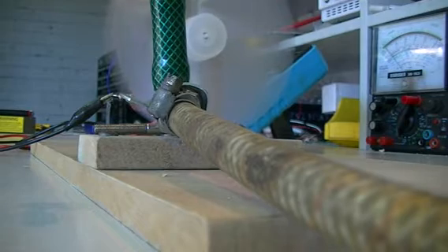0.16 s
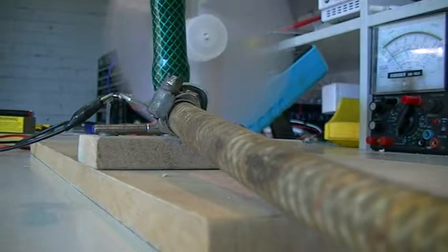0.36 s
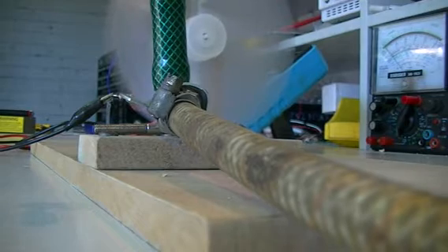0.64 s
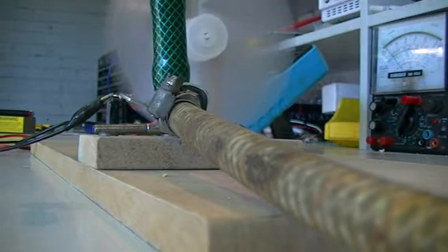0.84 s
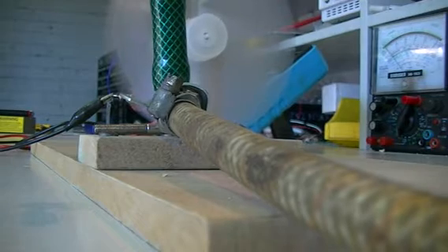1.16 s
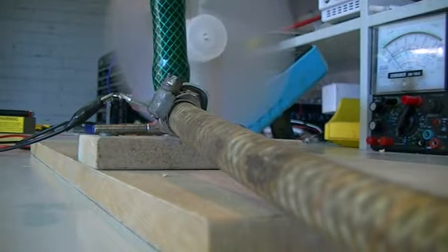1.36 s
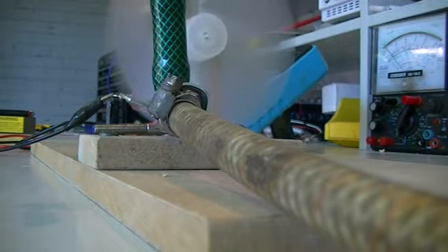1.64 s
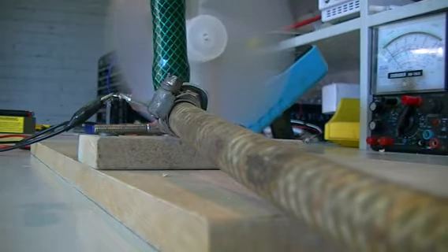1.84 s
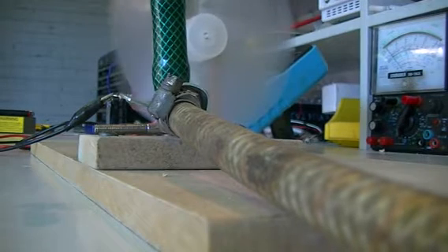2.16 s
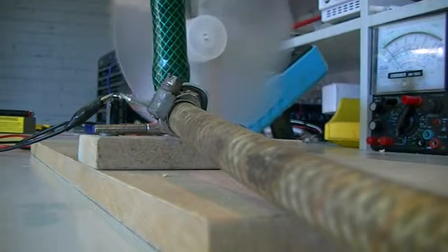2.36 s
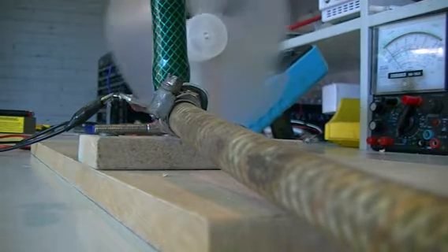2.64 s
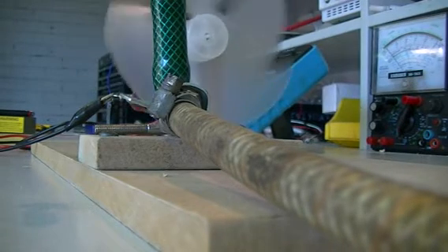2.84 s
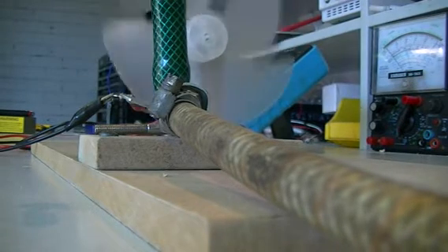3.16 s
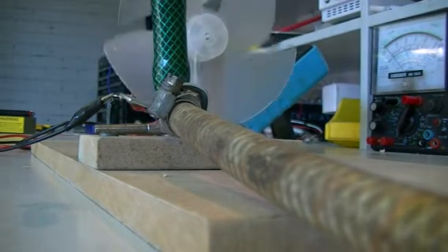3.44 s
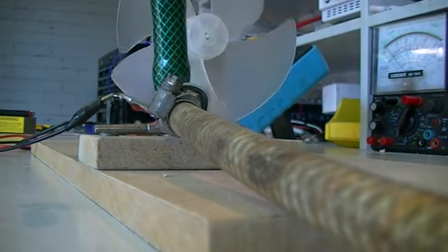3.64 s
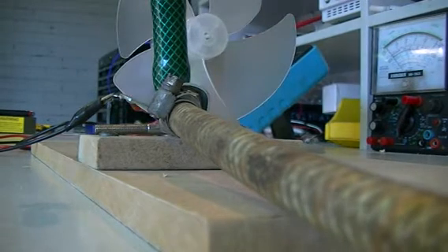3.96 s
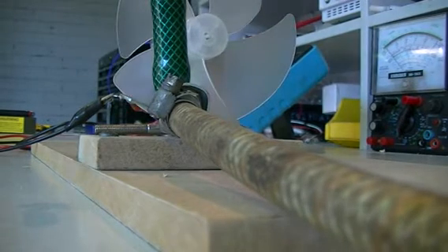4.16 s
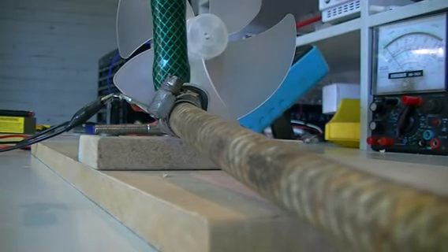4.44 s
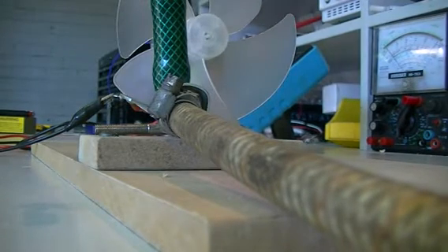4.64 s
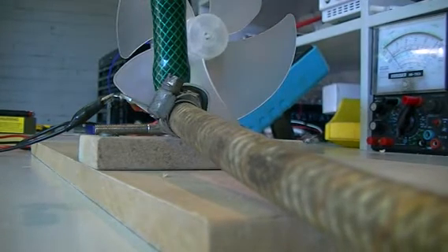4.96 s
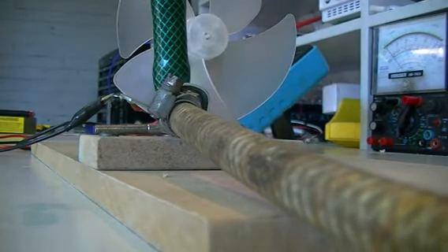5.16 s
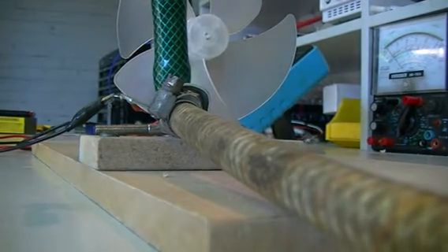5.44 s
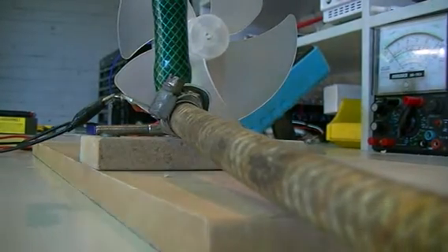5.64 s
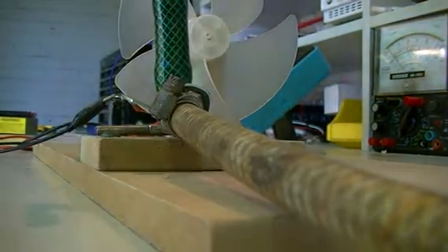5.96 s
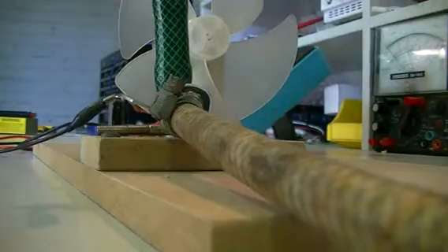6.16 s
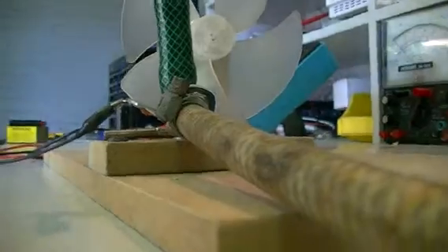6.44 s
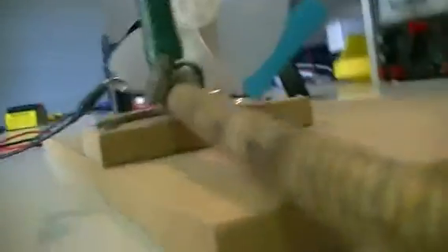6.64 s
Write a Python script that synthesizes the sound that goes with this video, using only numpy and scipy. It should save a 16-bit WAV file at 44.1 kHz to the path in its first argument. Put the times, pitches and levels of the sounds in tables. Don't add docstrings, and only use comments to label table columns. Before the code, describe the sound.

Loud steady air hiss with ringing whistle on a small fan, cut off, then a clattering compressor drone swells up, ending with a click.

```python
import sys
import numpy as np
from scipy import signal
from scipy.fft import rfft, irfft, next_fast_len
from scipy.io import wavfile
from scipy.ndimage import uniform_filter1d

SR = 44100
rng = np.random.default_rng(int(sys.argv[2]) if len(sys.argv) > 2 else 0)


def field_ratio(decibels):
    return 10 ** (np.asarray(decibels, dtype=float) / 20)


def materialize(psi):
    bounded = np.clip(np.atleast_2d(psi).T, -1, 1)
    quanta = np.round(bounded * 32767).astype(np.int16)
    wavfile.write(sys.argv[1], SR, quanta)


N = 299439
SIZE = next_fast_len(N)
HZ = np.maximum(np.fft.rfftfreq(SIZE, 1 / SR), 1)
T = np.arange(N) / SR
HELD_DB = -46.5


def since(s):
    return np.maximum(T - s, 0)


def unit(x):
    return x / np.sqrt(np.mean(x ** 2))


def noise(gain):
    spectrum = rng.standard_normal((len(HZ), 2)).view(complex)[:, 0]
    return irfft(gain * spectrum, SIZE)[:N]


def walk(rate):
    hold = int(SR / rate)
    levels = np.repeat(rng.standard_normal(N // hold + 1), hold)
    return 1.22 * uniform_filter1d(uniform_filter1d(levels, hold), hold)[:N]


def below(hz):
    return 1 / (1 + (HZ / hz) ** 4)


def resonance(hz, width):
    return 1 / (1 + (2 * (HZ - hz) / width) ** 4)


def burst(s, length):
    return np.exp(-((T - s) / length) ** 2)


def colour(points, modes, bed_db):
    hz, db = np.transpose(points)
    power = field_ratio(np.interp(np.log(HZ), np.log(hz), db) + bed_db) ** 2
    for centre, width, peak_db in modes:
        power = power + field_ratio(peak_db) ** 2 * resonance(centre, width)
    return np.sqrt(power)


def ripple(bumps):
    return field_ratio(sum(db * np.exp(-(2 * (HZ - hz) / width) ** 2) for hz, width, db in bumps))


def echoes(wet_db, t60):
    tail = rng.standard_normal(SIZE) * np.exp(-np.log(1000) * np.arange(SIZE) / SR / t60)
    return 1 + field_ratio(wet_db) * rfft(tail) / np.sqrt(np.sum(tail ** 2))


def patchy(gain, octaves, patchy_db, rate):
    place = np.clip(np.log2(HZ), octaves[0], octaves[-1])
    total = 0
    for octave in octaves:
        band = np.cos(np.pi * np.clip(place - octave, -.5, .5))
        total = total + noise(gain * band) * field_ratio(patchy_db * walk(rate))
    return total


# [t/s, level/dB, length/s]
JOLTS = [
    (0.004, -64, .005),
    (1.662, -62, .005),
    (1.84, -72, .005),
    (1.89, -68, .006),
    (6.41, -66, .008),
    (6.78, -54, .005),
]


def jolts():
    total = unit(noise(below(70))) * field_ratio(-106 + 3 * walk(5))
    for s, db, length in JOLTS:
        total += field_ratio(db) * (T - s) / length * burst(s, length) * 2.3
    return total


def panel():
    start, stop, hz, db = 4.17, 5.56, 776.5, -35
    fade = np.clip(np.minimum(T - start, stop - T) / 0.071, 0, 1)
    return field_ratio(db) * np.sin(2 * np.pi * hz * T) * fade


# [t/s, level/dB, f/Hz, width/Hz, length/s]
KNOCKS = [
    (3.151, -23, 680, 250, 0.022),
    (3.77, -26, 750, 300, 0.0068),
    (4.352, -32, 390, 100, 0.026),
    (4.396, -29, 810, 500, .006),
    (6.12, -34, 728, 16, 0.25),
    (2.3, -33, 645, 50, .25),
    (5.5, -31, 2920, 700, 0.023),
    (2.1, -33, 2880, 200, .2),
    (2.76, -34, 2900, 400, .06),
]


def bench():
    return sum(unit(noise(resonance(hz, width))) * field_ratio(db) * burst(s, length)
               for s, db, hz, width, length in KNOCKS)


# [f/Hz, level/dB per Hz]
MACHINE_COLOUR = [(24, -58), (40, -58), (193, -14), (280, -17.5), (408, -7), (485, -10.5), (623, -3.5),
                  (841, -8.5), (1190, -9.5), (1280, -6), (2170, -13.5), (3760, -14.5), (4480, -11),
                  (9700, -25.5), (15600, -49.5)]
# [f/Hz, width/Hz, level/dB]
CASING = [(135, 10, -24.5), (238, 14, -18), (328.2, 8.5, -10.5), (397, 14, -13), (421.2, 7.8, -5.5),
          (514.6, 11, -7.5), (607, 11, -5.5), (638, 21, -2.5), (691, 18, -3.5), (724, 24, -4.5),
          (776, 9, -6), (836, 17, -2.5), (864, 23, -.5), (948, 30, -7.5), (1091, 48, -10), (1307, 17, -7.5),
          (1426, 16, -7), (1630, 12, -7.5), (1944, 95, -13), (2407, 67, -9.5), (2646, 28, -9.5),
          (2820, 124, -14), (3030, 113, -11), (1760, 11, -9), (3460, 260, -13), (4370, 530, -16),
          (5570, 260, -19.5), (13200, 2800, -43.5)]
# [f/Hz, width/Hz, level/dB]
MACHINE_RIPPLE = [(2250, 110, -2), (3760, 120, -1), (3200, 80, 2), (3490, 110, -2.5), (4000, 120, 2.5),
                  (4900, 250, -2), (6100, 290, -1.5), (6460, 120, 2), (6880, 100, 4), (7280, 160, -3.5),
                  (7600, 90, 3.5), (9930, 170, -4), (10680, 100, -2), (10880, 120, 3), (11240, 200, -2.5),
                  (11550, 160, 2.5), (12720, 140, -3), (13180, 400, 3), (13680, 150, -5), (13970, 100, 3),
                  (14280, 300, -3.5), (14750, 220, -5), (15400, 400, -2.5)]
# [t/s, level/dB]
AIR_DRIFT = [(1.9, 1.5), (2.4, 0), (2.65, -1), (2.9, 1), (3.2, -1.2), (3.7, -.5), (4.05, -1.4), (4.35, 0.1),
             (4.7, -0.2), (5.1, 0.5), (5.5, 0), (5.7, 0.2), (6.1, .3), (6.4, -1), (6.79, 0)]


def compressor():
    crank_hz = 14.13
    lift_s, lift_treble_db = 6.42, -2
    gain = colour(MACHINE_COLOUR, CASING, bed_db=-4) * ripple(MACHINE_RIPPLE)
    phase = 2 * np.pi * crank_hz * T
    repeat = 1 / (1 - 0.78 * np.exp(-2j * np.pi * HZ / crank_hz))
    low = gain * np.sqrt(below(1690))
    body = patchy(low, np.arange(8, 11.1, .5), patchy_db=0.9, rate=3.48)
    body = body + field_ratio(-6.5) * noise(low * repeat)
    clatter_db = 0.2 * np.cos(3 * phase - 5.6) + .5 * np.cos(phase - 3.8) - 1.23

    stroke_db = 0.96 * np.cos(phase - 3.7) + 0.13 * np.cos(3 * phase - 5.2) + .5 * walk(24.98)
    middle = gain * np.sqrt((1 - below(1600)) * below(3430))
    air = patchy(middle, np.arange(10.5, 12.1, .5), patchy_db=1.3, rate=4.53)
    turned_away = np.clip(since(lift_s) / .05, 0, 1)
    valves = noise(gain * np.sqrt(1 - below(4560))) * field_ratio(lift_treble_db * turned_away)
    drift_db = np.interp(T, *np.transpose(AIR_DRIFT))
    return unit(body * field_ratio(clatter_db) + (air + valves) * field_ratio(stroke_db) * field_ratio(drift_db))


# [t/s, level/dB, f/Hz, t60/s]
TAPS = [
    (6.3978, -15, 1900, .004),
    (6.3978, -20, 7200, .003),
    (6.4012, -17.5, 6600, .008),
    (6.4055, -21, 7800, .004),
    (6.4012, -27, 9800, .003),
    (6.4058, -28, 10500, .003),
    (6.4097, -11, 1500, .003),
    (6.4118, -10, 1150, .004),
    (6.5526, -23, 1100, .006),
]


def finger():
    rub_s, rub_half_s, rub_db = 6.404, .0065, -22
    snap_s, snap_half_s, snap_db, snap_hz = 6.409, .00033, .8, 1600
    rub = unit(noise((1 - below(1100)) * below(7000) * np.sqrt(below(13000))))
    out = rub * field_ratio(rub_db) * np.exp(-((T - rub_s) / rub_half_s) ** 4)
    out -= field_ratio(snap_db) * np.cos(2 * np.pi * snap_hz * (T - snap_s)) * burst(snap_s, snap_half_s)
    age = np.arange(1024) / SR
    for s, peak_db, hz, t60 in TAPS:
        ring = np.sin(2 * np.pi * hz * age) * np.exp(-np.log(1000) * age / t60)
        soft_start = 1 - np.exp(-age / .0005)
        start = int(s * SR)
        out[start:start + len(age)] += field_ratio(peak_db) * ring * soft_start * 3.4
    return out


# [f/Hz, level/dB per Hz]
JET_COLOUR = [(59, -83), (100, -57), (124, -55), (146, -54), (387, -27.5), (554, -12.5), (628, -18),
              (827, -8), (1210, -5), (1340, -6), (3550, -9.5), (5540, -5.5), (6560, -8), (9790, -11.5),
              (15600, -34.5)]
# [f/Hz, width/Hz, level/dB]
TUBE = [(1203, 77, -16), (3190, 230, -11.5), (3855, 150, -7.5), (3960, 430, -10), (4160, 66, -23),
        (4860, 290, -7), (5230, 140, -7), (5327, 120, 0), (5500, 136, 1), (5700, 130, -1), (5910, 160, -5),
        (6140, 150, -5.5), (6940, 71, -20), (7150, 490, -8.5), (7470, 200, -7), (8740, 120, -15),
        (9490, 430, -12), (10100, 150, -18), (11950, 540, -17.5), (14300, 1800, -29)]
# [f/Hz, width/Hz, level/dB]
JET_RIPPLE = [(562, 37, 3), (2870, 120, 2.5), (3396, 84, 3.5), (4400, 80, 2), (6140, 80, 1), (7600, 90, -1),
              (7770, 250, 1.5), (8760, 100, 2), (10130, 300, 2), (10750, 90, -3), (11220, 100, 3),
              (11950, 250, -3), (12100, 90, 4), (12730, 220, 4), (13030, 100, -3), (13630, 90, 3),
              (13850, 90, -3), (14250, 500, 2.5), (15070, 150, -6), (15390, 120, -4)]
# [multiple of the blade rate, level/dB]
BLADE_HUM = [(2, -84), (3, -77)]


def jet():
    blade_hz, loudest_turn = 51.5, 0.59
    open_hiss_db, open_roar_db = -17, -9.5
    valve_s, closing_s = 1.743, 0.082
    closing_db_per_s, shut_db_per_s = 115, 232
    roar_lingers = .2
    fall_db = closing_db_per_s * np.minimum(since(valve_s), closing_s)
    fall_db = fall_db + shut_db_per_s * since(valve_s + closing_s)
    hiss_db = open_hiss_db - fall_db
    roar_db = open_roar_db + roar_lingers * fall_db

    gain = colour(JET_COLOUR, TUBE, bed_db=-3) * echoes(-14.5, 0.23) * ripple(JET_RIPPLE)
    phase = 2 * np.pi * (blade_hz * T - loudest_turn)
    roar = unit(noise(gain * np.sqrt(below(2510)))) * field_ratio(roar_db + 3.0 + 0.54 * walk(29.8))
    whistle = noise(gain * np.sqrt((1 - below(3230)) * below(5700)))
    whistle = whistle * field_ratio(1.4 * np.cos(phase) + 1.0 * walk(89.45))
    sizzle = noise(gain * np.sqrt(1 - below(8000)))
    sizzle = sizzle * field_ratio(1.1 * np.cos(phase + 0.45) + 0.51 * walk(61.5))
    hum = sum(field_ratio(db - open_hiss_db + 3.5 * walk(6)) * np.cos(multiple * phase)
              for multiple, db in BLADE_HUM)
    return field_ratio(hiss_db) * (roar + hum + unit(whistle + sizzle) * field_ratio(1.27))


def scene():
    small_sounds = (panel() + bench() + finger()) * field_ratio(23.5)
    mono = compressor() * field_ratio(0.94) + small_sounds + jet() / field_ratio(HELD_DB)
    return np.array([mono, mono])


# [t/s, depth/dB, hold/s]
DUCKS = [
    (3.17, 0, 0.054),
    (3.5, 0.5, .7),
    (6.42, 2, 0.049),
    (6.58, 2, 0.18),
]


def camera_gain_db():
    release_s, climb_db_per_s, ceiling_db = 1.994, 37, -24
    gain_db = np.minimum(HELD_DB + climb_db_per_s * since(release_s), ceiling_db)
    for s, db, hold in DUCKS:
        backing_off = np.clip(since(s) / .02, 0, 1)
        recovering = np.clip((s + hold - T) / 0.025 + 1, 0, 1)
        gain_db = gain_db - db * backing_off * recovering
    return gain_db


# [f/Hz, level/dB]
STARVE = [(6000, -14), (8000, -8), (10000, -5), (12000, -3), (13500, -1.5), (15700, 0)]


def lose_faint_treble(x):
    hz, _, cells = signal.stft(x, SR, nperseg=2048)
    power = np.abs(cells) ** 2
    patch = uniform_filter1d(power, size=4, axis=0)
    around = uniform_filter1d(power, size=61, axis=0)
    total = power.sum(axis=0)
    loud_db = np.clip(10 * np.log10(total / np.median(total)), -6, 8)
    edge_db = np.interp(hz, *np.transpose(STARVE), left=-99)[:, None] - .3 * loud_db
    keep = (patch > around * field_ratio(2 * edge_db)) * (hz < 15760)[:, None]
    return signal.istft(cells * keep, SR, nperseg=2048)[1][:N]


# [t/s, level/dB, f/Hz, width/Hz]
SPLITS = [
    (1.078, -30, 9050, 1500),
    (3.652, -39, 5780, 1200),
    (3.746, -45, 6950, 1400),
    (3.839, -45, 6950, 1400),
    (4.957, -35, 4980, 1600),
    (5.676, -37, 4980, 1600),
    (6.442, -41, 4750, 1050),
]


def splits():
    return sum(unit(noise(1. * (np.abs(HZ - hz) < width / 2))) * field_ratio(db) * burst(s, .013)
               for s, db, hz, width in SPLITS)


def roll_off(x):
    return signal.sosfilt(signal.butter(12, 15740, fs=SR, output="sos"), x)


def record(dry):
    mono = lose_faint_treble(dry[0] * field_ratio(camera_gain_db()) + jolts())
    mix = mono + np.outer([1, -1], splits())
    return roll_off(mix)


dry = scene()
out = record(dry)
materialize(out)
```